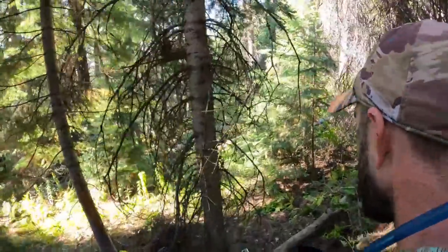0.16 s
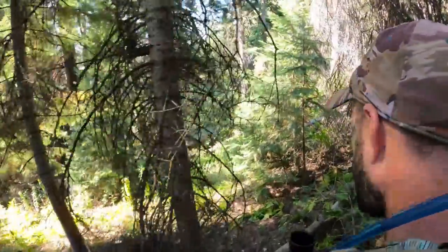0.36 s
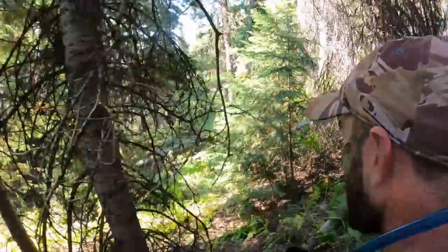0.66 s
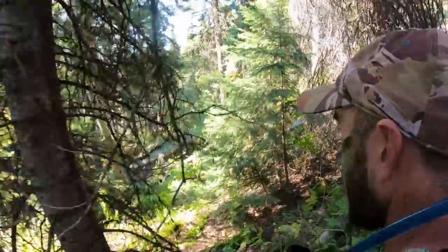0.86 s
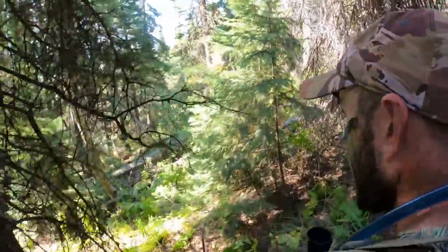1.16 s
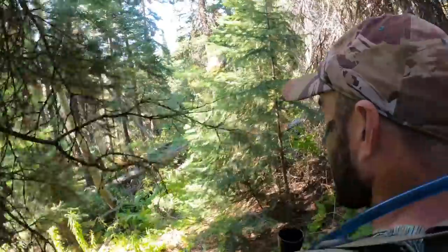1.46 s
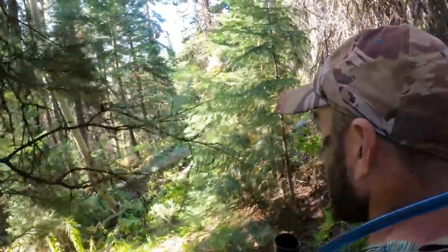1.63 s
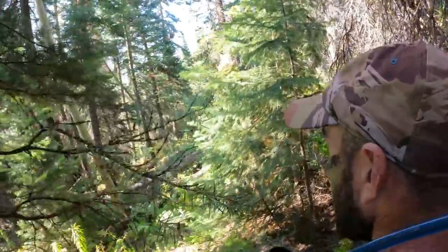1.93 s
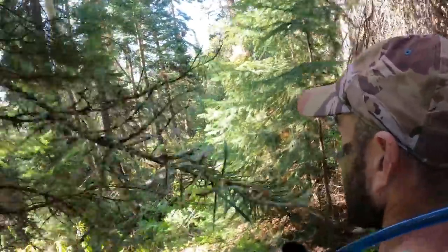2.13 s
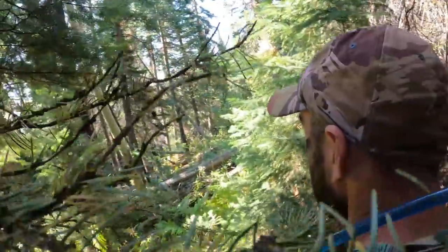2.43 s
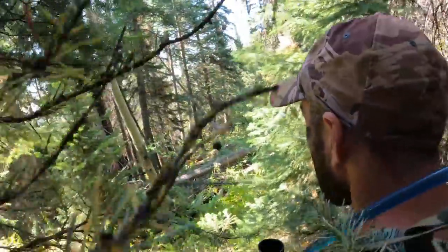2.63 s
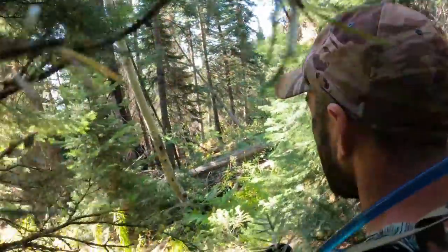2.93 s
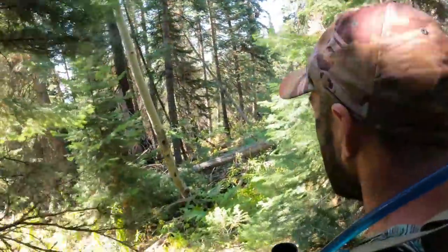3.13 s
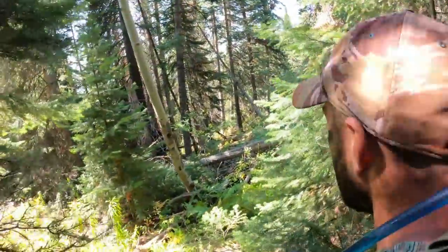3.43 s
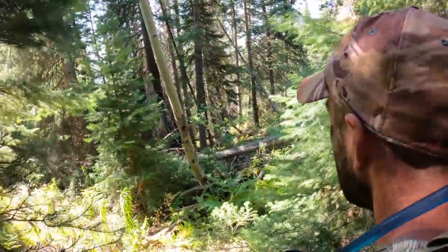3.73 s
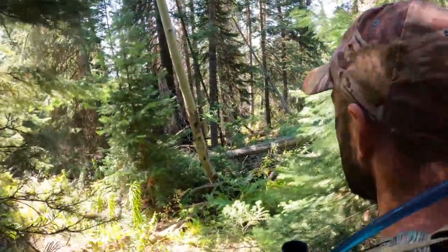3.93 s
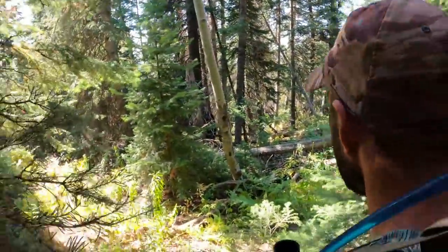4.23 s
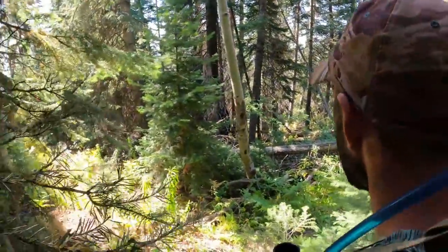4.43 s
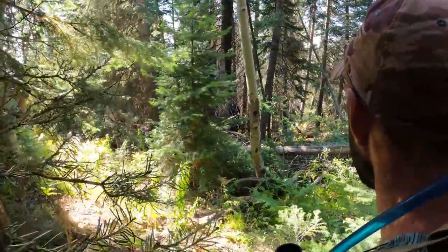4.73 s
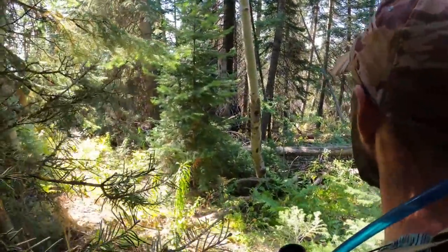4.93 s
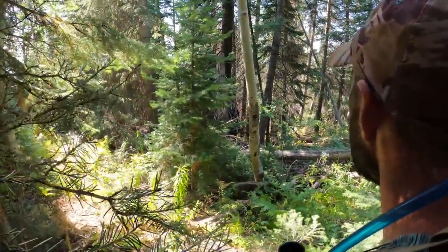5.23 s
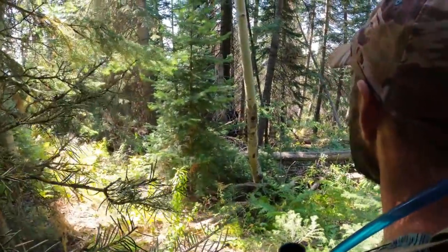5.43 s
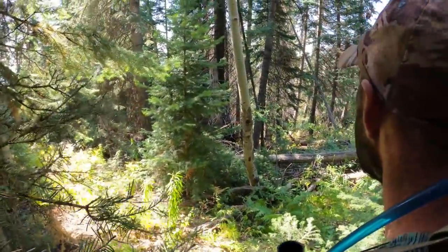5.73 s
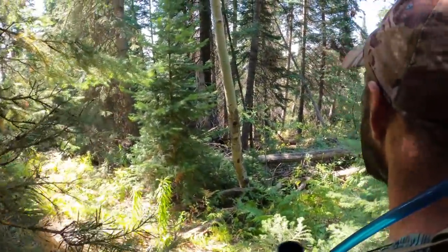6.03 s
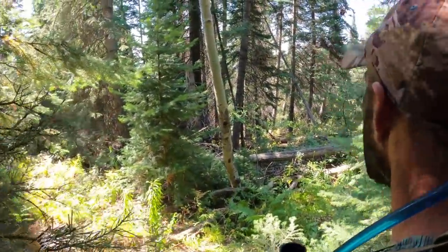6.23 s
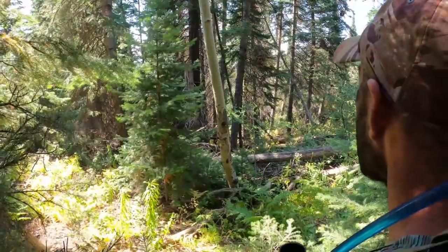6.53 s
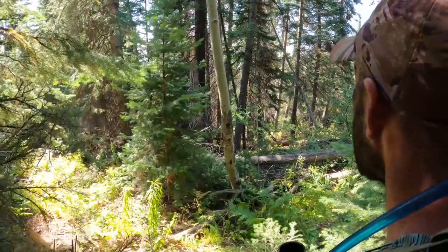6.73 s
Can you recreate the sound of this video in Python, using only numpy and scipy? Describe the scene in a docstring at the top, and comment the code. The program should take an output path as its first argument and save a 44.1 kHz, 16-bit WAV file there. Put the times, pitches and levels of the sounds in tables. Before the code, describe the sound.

Someone pushes through forest undergrowth with rustling fabric, gear bumps and a raspy branch scrape, pauses quietly, then snaps twigs and crunches brush underfoot.

```python
"""Clothes and leaves rustle and dull knocks sound as someone with a shoulder camera walks through dense woodland.
A fir branch drags its needles over the camera, the walker nearly halts, and boots then crunch dry brush.
Friction is shaped noise strewn with tiny fractures; knocks, twigs and needles are driven, damped resonances.
Bumps and heels are low swings that fade; the trunks scatter the twigs and brush back as a decaying noise tail.
"""
import sys
import numpy as np
from scipy import signal
from scipy.fft import rfft, irfft, next_fast_len
from scipy.io import wavfile
from scipy.ndimage import map_coordinates

SR = 44100
rng = np.random.default_rng(int(sys.argv[2]) if len(sys.argv) > 2 else 0)


def transcribe(u):
    """Save the signal u as a 16-bit wav file named by the first command-line argument.

    u: samples, shape (n,) or (channels, n), limited to [-1, 1]; the rate is SR.
    q: integer samples, one column per channel.
    """
    v = np.clip(np.atleast_2d(u).T, -1, 1)
    q = np.round(v * 32767).astype(np.int16)
    wavfile.write(sys.argv[1], SR, q)


N = 302967  # samples

# In all tables levels are relative, before common gains and the microphone; pan_db is left minus right.


def amp(db):
    """Decibel law: 20 dB is a factor of ten in amplitude."""
    return 10 ** (np.asarray(db) / 20)


def unit(x):
    """Normalisation of mean power: scale to rms 1."""
    return x / np.sqrt(np.mean(x ** 2) + 1e-20)


def along(points, hz):
    """Interpolation of (frequency, value) points on a logarithmic frequency axis."""
    f, v = np.transpose(points)
    return np.interp(np.log(hz + 1), np.log(f + 1), v)


def gains(rows):
    """Envelope law: straight lines in decibels, one gain per sample for each column, -120 dB outside."""
    s, *columns = np.transpose(rows)
    t = np.arange(N) / SR
    return [amp(np.interp(t, s, c, left=-120, right=-120)) for c in columns]


def wobble(rate):
    """Slow random modulation: a smooth curve through `rate` random knots a second."""
    knots = rng.standard_normal(int(N * rate / SR) + 4)
    return map_coordinates(knots, [np.arange(N) * rate / SR])


def filtered(x, response):
    """Linear filtering: multiply the spectrum by a complex response of frequency."""
    n = x.shape[-1]
    m = next_fast_len(n + 4096)  # padding keeps ringing from wrapping round
    return irfft(rfft(x, m) * response(np.fft.rfftfreq(m, 1 / SR)), m)[..., :n]


def resonance(f, hz, q):
    """Damped oscillator: the causal response of one mode, with gain 1 at its pitch."""
    return 1j * f * hz / q / (hz * hz - f * f + 1j * f * hz / q)


def panned(x, pan_db):
    """Level-difference stereophony: split pan_db between left and right."""
    return x * unit(amp(np.array([[pan_db], [-pan_db]]) / 2))


def out_of_step(x, radians):
    """Structure-borne phase shift: the left port moves later in its cycle than the right."""
    return filtered(x, lambda f: np.exp(.5j * radians * np.array([[-1], [1]])))


def add(out, s, x):
    """Superposition: mix x into out from time s."""
    i = max(round(s * SR), 0)
    out[:, i:i + x.shape[-1]] += x[:, :max(N - i, 0)]


def crackle(n, rate, spread_db, smooth):
    """Granular friction: two rows of tiny unequal fractures on a bed of smooth noise."""
    size = amp(spread_db * np.minimum(rng.exponential(size=n), 3))
    fractures = (rng.random(n) < rate / SR) * size * rng.uniform(-1.0038, 1, (2, n))
    return unit(unit(fractures) + smooth * rng.standard_normal((2, n)))


def ticks(rate, hz, spread_db):
    """Random impulses on damped modes: sparse tiny twigs give way, each at its own pitch; rms 1."""
    count = int(rate * N / SR)
    when, size, pitch, place = rng.random((count, 4)).T
    t = np.arange(SR // 100) / SR
    own_hz = hz * 3 ** (2 * pitch - 1)  # from a third of hz to three times it
    cycles = own_hz[:, None] * t
    rings = amp(spread_db * size ** 2)[:, None] * np.sin(2 * np.pi * cycles) * np.exp(-cycles / 1.3)
    at = (when * N).astype(int)[:, None] + np.arange(len(t))
    sides = []
    for side in (place, 1 - place):
        weighted = rings * (1 + side)[:, None]
        sides.append(np.bincount(at.ravel(), weighted.ravel(), N)[:N])
    return unit(np.array(sides))


def coloured(pair, spectrum, alike):
    """Interchannel coherence: two unrelated rows become stereo of this spectrum and likeness, rms 1."""
    turn = lambda f: np.arccos(np.clip(along(alike, f), -1, 1)) / 2
    mid_side = lambda f: np.array([np.cos(turn(f)), np.sin(turn(f))])
    mid, side = filtered(pair, lambda f: amp(along(spectrum, f)) * mid_side(f))
    return unit(np.array([mid + side, mid - side]))


# spectrum of the air: frequency_hz [Hz], density_db [dB per Hz]
AIR_SPECTRUM = [(20, 4.5), (45, -4), (80, -27), (130, -5.5), (190, 2.5), (400, 2.5), (850, -10),
                (1200, -1.5), (2000, -12.5), (4000, -31), (7500, -27), (10000, -39.5), (15000, -43)]
# left-right likeness of airborne sound: frequency_hz [Hz], likeness [-1 to 1]
AIRBORNE_LIKENESS = [(100, 0.012), (200, 0.9975), (400, 0.8), (1200, 0.7629), (3000, 0.69), (8000, 0.29)]


def forest_air():
    """Broadband ambient noise: faint, nearly steady air in the trees."""
    noise = rng.standard_normal((2, N))
    return amp(-62 + 1.1 * wobble(6)) * coloured(noise, AIR_SPECTRUM, AIRBORNE_LIKENESS)


def trunks(x, t60):
    """Multiple scattering: the trees return a thin, dull, exponentially decaying tail."""
    t = np.arange(SR // 2) / SR
    tail = rng.standard_normal((2, len(t))) * amp(-60 * t / t60) * (1 - np.exp(-t / 0.011))
    tail = filtered(tail, lambda f: resonance(f, 1200, q=0.9358))
    return signal.fftconvolve(x, tail / np.linalg.norm(tail[0]), axes=1)[:, :N]


def squeak(s, db, length):
    """Narrow-band resonance: a faint, short, hollow squeak of two notes."""
    low_high = lambda f: resonance(f, 772.96, q=11.85) ** 2 + .5 * resonance(f, 1238, q=17.72) ** 2
    notes = filtered(rng.standard_normal(N), low_high)
    return amp(db) * unit(notes) * np.exp(-((np.arange(N) / SR - s) / length) ** 2 / 2)


# how briskly the walker moves: time_s [s], effort_db [dB]
EFFORT = [(0, -3), (.3, -7), (.6, 0.5), (1.05, -0.5), (1.5, -3), (1.8, 0.5), (2.07, -3), (2.35, 0.5),
          (2.62, 0), (3.2, -2), (3.38, -1.5), (3.54, -14), (3.98, -17), (4.3, -4), (4.7, -13), (4.88, -17),
          (5.05, -11.5), (5.45, -23), (5.7, -20)]
# strides and smaller shifts of the body: start_s [s], rise_s [s per 20 dB], hold_s [s],
# cloth_db [dB], leaves_db [dB], pack_rub_db [dB]
MOVES = [(0, 0.01994, .04, -50, -51, -44.5), (0.213, 0.0474, 0.0306, -63.5, -67.5, -51),
         (.521, .025, .012, -36, -48, -36), (.575, .08, .05, -41, -45, -40),
         (0.779, 0.044, .045, -45.5, -51.5, -43), (.93, 0.071, .05, -49.5, -54.5, -48),
         (1.149, 0.05068, 0.06178, -38, -43.5, -37.5), (1.359, .03, .025, -43.5, -60, -48),
         (1.45, 0.0679, .08, -54, -65, -46), (1.625, .11, .07, -42, -46.5, -46.5),
         (1.77, 0.1005, .09, -50.5, -59, -43), (1.938, 0.0861, 0.05927, -52.5, -56, -42),
         (2.12, 0.02855, .02, -54, -53.5, -51), (2.22, 0.045, 0.06094, -49, -61, -41),
         (2.295, 0.03905, .04, -44.5, -49.5, -42), (2.355, .05, .035, -38, -48, -39),
         (2.48, .06, .05, -45, -51, -41), (2.64, .05, .07, -58, -53, -62),
         (2.724, .03, .02, -41.5, -51, -42), (2.871, 0.0617, 0.02873, -48.5, -59, -43.5),
         (3.008, 0.07994, 0.03133, -45, -47, -42.5), (3.122, .08, .045, -36, -39, -32),
         (3.288, 0.05127, 0.04816, -45.5, -52.5, -45.5), (4.255, 0.12764, .035, -46, -50.5, -45.5),
         (4.381, .04, 0.02345, -48.5, -57.5, -52), (4.469, 0.0783, .07, -56.5, -56.5, -61),
         (6.699, 0.06315, 0.0485, -68.5, -71.5, -50.5)]
CLOTH_DB, LEAF_DB, RUB_DB, RUMBLE_DB = -53.5, -56.5, -52, -67  # relative beds at an effort of 0 dB
CLOTH_GROWS, PACK_GROWS = 0.7758, 0.7302  # dB per dB of effort
MOVE_T60_S = 0.2694  # a rustle settles after each move


def movement():
    """Addition of powers: cloth, leaf and pack gains follow the effort and swell with every move."""
    t = np.arange(N) / SR
    effort_db = np.interp(t, *np.transpose(EFFORT))
    cloth_db = CLOTH_DB + CLOTH_GROWS * effort_db
    rub_db = RUB_DB + PACK_GROWS * effort_db
    power = amp([cloth_db, LEAF_DB + effort_db, rub_db]) ** 2
    for s, rise, hold, *levels_db in MOVES:
        swell_db = -20 * np.maximum(s - t, 0) / rise - 60 * np.maximum(t - s - hold, 0) / MOVE_T60_S
        power += np.outer(amp(levels_db), amp(np.maximum(swell_db, -120))) ** 2
    return np.sqrt(power)


# the load lurches on the shoulder: peak_s [s], rumble_db [dB], fade_s [s per 20 dB on either side]
LURCHES = [(.21, -52, 0.0139), (.66, -49, .13), (1.2, -44, 0.1829), (1.88, -50.5, .12), (2.28, -47, .09),
           (2.41, -40.5, 0.0983), (3.16, -52, 0.1166), (4.13, -62, .16), (4.36, -52.5, 0.2072),
           (6.46, -58.5, 0.2358), (6.76, -60.5, 0.13)]


def sway():
    """Addition of powers: the mount's rumble gain follows the effort and swells with every lurch."""
    t = np.arange(N) / SR
    bed = amp(RUMBLE_DB + PACK_GROWS * np.interp(t, *np.transpose(EFFORT)))
    swells = sum(amp(db - 20 * np.abs(t - s) / fade) ** 2 for s, db, fade in LURCHES)
    return np.sqrt(bed ** 2 + swells)


# spectra of the rubbing pack and the shaken mount: frequency_hz [Hz], density_db [dB per Hz]
PACK_SPECTRUM = [(70, -33), (130, -6), (195, 1.5), (260, -4), (400, -21), (800, -59)]
MOUNT_SPECTRUM = [(12, -4.5), (25, 8), (50, -5.5), (80, -13), (120, -26.5), (220, -49.5)]
# left-right likeness of sound through the housing: frequency_hz [Hz], likeness [-1 to 1]
HOUSING_LIKENESS = [(30, -0.028), (200, 0.97645), (4000, .35), (9000, .1)]


def pack(rumble_gain, rub_gain):
    """Stick-slip and structure-borne sound: the swaying pack rubs hollowly and shakes the camera mount."""
    rumble = coloured(rng.standard_normal((2, N)), MOUNT_SPECTRUM, HOUSING_LIKENESS)
    friction = crackle(N, rate=250, spread_db=-0.5, smooth=.8)
    rub = out_of_step(coloured(friction, PACK_SPECTRUM, HOUSING_LIKENESS), radians=1.4)
    rub = unit(rub * amp(1.5 * wobble(22)))  # sticks and slides by turns
    return amp(13.0) * rumble_gain * panned(rumble, pan_db=-3.5) + amp(1.5) * rub_gain * panned(rub, pan_db=-4.5)


# spectra of rubbing clothes and leaves: frequency_hz [Hz], density_db [dB per Hz]
CLOTH_SPECTRUM = [(150, -19), (300, 0), (500, 1), (850, -5), (1150, 0), (1600, -6.5), (2400, -24),
                  (5000, -39.5)]
LEAF_SPECTRUM = [(900, -8.5), (1800, 1.5), (2500, 1.5), (4000, 0), (7000, -3.5), (9000, -11.5),
                 (12500, -18.5), (15500, -33)]


def rustle(cloth_gain, leaf_gain):
    """Intermittent friction: cloth and leaves rub in shared small jerks, with small twigs ticking."""
    jerks = wobble(55)
    cloth = coloured(crackle(N, rate=300, spread_db=2.0, smooth=0.91), CLOTH_SPECTRUM, AIRBORNE_LIKENESS)
    leaves = coloured(crackle(N, rate=1200, spread_db=1.0, smooth=1), LEAF_SPECTRUM, AIRBORNE_LIKENESS)
    cloth = unit(cloth * amp(2 * jerks)) + amp(-7.5) * ticks(rate=42, hz=954.8, spread_db=13.5)
    leaves = unit(leaves * amp(1.7398 * jerks)) + amp(-10.5) * ticks(rate=57, hz=3200, spread_db=12)
    return panned(amp(-.5) * cloth_gain * cloth + amp(4.5) * leaf_gain * leaves, pan_db=-0.1012)


# footfalls and bumps felt through the mount: middle_s [s], level_db [peak dB], pitch_hz [Hz],
# half_length_s [s, standard deviation], pan_db [dB]
BUMPS = [(.21, -43, 75, .012, -3), (.522, -24.5, 326.9, 0.00346, 0), (0.667, -30, 139.1, 0.002598, 0),
         (1.164, -31, 46, .01, -9), (1.195, -29.5, 72.3, 0.02008, -3), (1.243, -24, 112.8, 0.004217, -2),
         (1.64, -33, 450.3, 0.00362, -1), (2.242, -33, 82.45, 0.0136, -10),
         (2.39, -19, 169.3, 0.002518, -2.5), (2.407, -28, 66.16, .026, -5.5),
         (3.125, -16, 237.7, .002, 6.5), (3.14, -25, 70.24, 0.00932, 3), (3.1754, -5, 190, .0014, 1.5),
         (6.18, -42, 165, .015, 0), (6.733, -42, 125.4, 0.006533, 0.5)]


def bumps():
    """Structure-borne impulses: low swings under a bell envelope reach the two ports out of step."""
    out, t = np.zeros((2, N)), np.arange(-SR // 8, SR // 8) / SR
    for s, db, hz, length, pan_db in BUMPS:
        swing = np.cos(2 * np.pi * hz * t + rng.uniform(0, 2 * np.pi))
        add(out, s + t[0], amp(db + 0.5) * panned(swing * np.exp(-(t / length) ** 2 / 2), pan_db))
    return out_of_step(out, radians=1.4)


# dull knocks of gear and sticks, sounded 2 ms after start_s: start_s [s], level_db [peak dB],
# pitch_hz [Hz], pan_db [dB]
KNOCKS = [(.362, -31.5, 400.1, 1), (.521, -20, 379.8, -1.5), (.576, -20.5, 773, -1), (.619, -19, 1129, -2),
          (.811, -23.5, 1038, -1), (1.148, -19, 1391, 1), (1.188, -21, 690.6, -6),
          (1.356, -27, 321.4, -0.5), (1.635, -24, 477, 0.5), (1.989, -31, 490.4, -3.5),
          (2.384, -12, 470, 6), (2.522, -22.5, 611.7, -4), (2.608, -29, 1370, 3), (3.15, -21, 401.9, -18),
          (3.249, -31, 438.7, -0.5), (3.589, -38.5, 301.4, 1), (4.261, -31, 998.5, 1.5),
          (4.296, -29, 1069, 0), (4.378, -32, 1134, -2.5), (4.935, -31.5, 776, -6)]
KNOCK_T60_S = .035  # rattle after each knock


def knocks():
    """Impact excitation: a tap and a short rattle drive one well damped resonance."""
    out, t = np.zeros((2, N)), np.arange(SR // 8) / SR
    for s, db, hz, pan_db in KNOCKS:
        noise = rng.standard_normal((3, len(t)))
        rattle = noise[0] + 0.78 * noise[1:]  # a shared part and one for each side
        force = (t == 0) + 0.07952 * rattle * amp(-60 * t / KNOCK_T60_S)
        knock = filtered(force, lambda f: resonance(f, hz, q=1.477) / (1 + 1j * f / (4 * hz)))
        add(out, s + .002, amp(db) * panned(knock / np.abs(knock).max(), pan_db))
    return out


# a heel landing on hollow forest floor: start_s [s], level_db [peak dB], pitch_hz [Hz], rise_s [s], t60_s [s]
HEELS = [(6.145, -22.5, 55.26, 0.031, 0.1597), (6.198, -30, 90.23, 0.00529, 0.1407)]


def heels():
    """Mass on a spring: the ground takes the weight, swings and settles."""
    out, t = np.zeros((2, N)), np.arange(SR // 3) / SR
    for s, db, hz, rise, t60 in HEELS:
        swell = np.minimum(t / rise, amp(-60 * (t - rise) / t60))
        add(out, s, amp(db) * (swell * np.sin(2 * np.pi * hz * t))[None])
    return out


# bent hardest, the branch lets go needle after needle
DRAG_S, DRAG_EVERY_S, DRAG_SCATTER_S = 3.094, .0107, .002  # start, interval, unevenness
DRAG_DB, DRAG_HALF_S, DRAG_PAN_DB = -19.5, .0026, -12  # mean relative level, half length, left minus right
DRAG_HZ, DRAG_SPREAD_OCTAVES = 4460, .04  # middle pitch and its spread


def drag(count):
    """Repeated stick-slip: rows like those of SLIPS for a quick, uneven run of needles."""
    rows = []
    for k, (late, strong, high) in enumerate(rng.standard_normal((count, 3))):
        middle = DRAG_S + k * DRAG_EVERY_S + DRAG_SCATTER_S * late
        hz = DRAG_HZ * 2 ** (DRAG_SPREAD_OCTAVES * high)
        rows.append((middle, DRAG_DB + 1.5 * strong, DRAG_HALF_S, hz, DRAG_PAN_DB))
    return rows


# the fir branch sliding over the camera: time_s [s], level_db [dB]
BRANCH = [(2.62, -66), (2.92, -57), (2.99, -42), (3.05, -39), (3.09, -34.5), (3.18, -38), (3.22, -70.5)]
# single needles catching and slipping: middle_s [s], level_db [dB], half_length_s [s, standard deviation],
# pitch_hz [Hz], pan_db [dB]
SLIPS = [(1.155, -31, 0.00497, 6470, -3), (2.348, -24, 0.001085, 7045, -10),
         (2.3682, -18, 0.000846, 7592, 1), (2.3833, -12, 0.0010727, 7743, -4),
         (2.423, -30, 0.001957, 7096, -6), (2.438, -32, .0038, 7400, -3), (2.607, -34, .0008, 3500, 2.5),
         (2.737, -25.5, .003, 4500, -15), (2.838, -38.5, .0017, 4300, -4),
         (2.878, -30, 0.0008885, 4180, -2), (2.916, -36.5, 0.000363, 7500, -5),
         (3.009, -18, 0.003017, 4842, -16), (3.034, -17.5, .0027, 4516, -13.5),
         (3.049, -26, .0012, 4500, -2.5), (3.069, -16, 0.000968, 4531, -2),
         (3.129, -21.5, .006, 5908, -6.5), (3.146, -21.5, .0024, 5500, -7), (3.137, -21.5, .002, 3800, -8),
         (3.152, -23, .0019, 1670, -13), (3.184, -20.5, 0.00474, 6532, -5),
         (3.203, -24, 0.0011304, 3116, 0)]
# spectrum of scraping needles: frequency_hz [Hz], density_db [dB per Hz]
NEEDLE_SPECTRUM = [(1000, -30.5), (3300, -11), (4500, 4), (5200, -8), (6800, -10), (8000, -12.5),
                   (9500, -12.5), (11000, -18.5), (15500, -25)]
# response of the camera housing: frequency_hz [Hz], gain_db [dB]
HOUSING_RESPONSE = [(600, -10), (2800, -6.5), (4300, 0.5), (7000, -2.5), (8200, -4), (9600, 0),
                    (11500, -6.5), (15500, -4.5)]


def fir_branch():
    """Stick-slip friction: needles scrape the housing, and those that catch chatter at their own pitch."""
    slide = coloured(crackle(N, rate=1100, spread_db=6.5, smooth=.5), NEEDLE_SPECTRUM, HOUSING_LIKENESS)
    slide = unit(slide * amp(6.3 * wobble(91)))
    out = amp(4.5) * gains(BRANCH)[0] * panned(slide, pan_db=-12.5)
    t = np.arange(-SR // 40, SR // 40) / SR
    for s, db, length, hz, pan_db in SLIPS + drag(count=8):
        grip = np.exp(-(t / length) ** 2 / 2)
        chatter = rng.standard_normal((2, len(t))) * grip
        chatter = chatter + 0.21 * chatter[::-1]  # each port also hears the other's side
        modes = lambda f: resonance(f, hz, q=7.2) + 0.17 * resonance(f, 1.5 * hz, q=9.1)
        body = lambda f: modes(f) * amp(along(HOUSING_RESPONSE, f))
        slip = unit(filtered(chatter, body)) * np.sqrt(np.mean(grip ** 2))
        add(out, s + t[0], amp(db - 1.5) * panned(slip, pan_db))
    return out


# twigs breaking underfoot or against the walker: start_s [s], level_db [peak dB], pitch_hz [Hz], pan_db [dB]
SNAPS = [(.342, -36, 2497, 0), (.364, -36, 2200, 0), (.524, -24, 3500, 0), (.813, -27, 1700, 3),
         (1.992, -29, 2508, 4.5), (2.3466, -15.5, 4000, -7), (2.375, -14, 5000, 2),
         (2.3833, -12, 3200, -12.5), (2.3879, -6.5, 3074, 8), (2.7322, -16.5, 3958, -11.5),
         (4.925, -35.5, 1508, -0.5), (5.781, -33.5, 1366, -2.5), (5.805, -32.5, 1656, -2),
         (5.909, -26, 1595, -1.5), (5.9608, -14, 1869, -1.5), (5.969, -12.5, 1260, -1),
         (6.14, -26, 2200, 0.5), (6.162, -10.5, 2443, -1.5), (6.1986, -6.5, 3717, -1),
         (6.302, -25, 1188, -1.5), (6.449, -24.5, 4546, -4), (6.665, -25.5, 3786, -2.5)]
# splintering time at this pitch; thicker, lower twigs take longer by this power
SPLINTER_T60_S, SPLINTER_HZ, SPLINTER_LAW = .019, 2400, .5


def twigs():
    """Brittle fracture: one sharp crack and brief splintering excite the modes of the wood."""
    out, t = np.zeros((2, N)), np.arange(SR // 12) / SR
    for s, db, hz, pan_db in SNAPS:
        t60 = SPLINTER_T60_S * (SPLINTER_HZ / hz) ** SPLINTER_LAW
        noise = rng.standard_normal((3, len(t)))
        splinters = noise[0] + 0.3276 * noise[1:]
        force = (t == 0) + 0.09918 * amp(-60 * t / max(t60, .003)) * splinters
        modes = lambda f: resonance(f, hz, q=2.8) + 0.1864 * resonance(f, 2 * hz, q=0.8)
        # thick, low twigs also break with less treble
        wood = lambda f: modes(f) / (1 + 1j * f / (2 * hz)) / (1 + 1j * f / 9000)
        crack = filtered(force, wood)
        add(out, s, amp(db - 0.5) * panned(crack / np.abs(crack).max(), pan_db))
    return out


# dry brush stirring around the boots: time_s [s], level_db [dB]
BRUSH = [(5.7, -66), (5.84, -65), (5.9, -48.5), (6.05, -40), (6.12, -46.5), (6.25, -44), (6.5, -52.5),
         (6.87, -50.5)]
# brush giving way under a boot: start_s [s], level_db [dB], rise_s [s], t60_s [s], centre_hz [Hz]
CRUSHES = [(4.738, -44.5, .0015, .26, 2100), (5.57, -57, 0.00315, 0.1497, 3500),
           (5.723, -49.5, 0.00146, 0.3516, 1731), (5.799, -48, 0.006085, 1, 1206),
           (5.907, -36.5, 0.000953, .45, 2256), (5.958, -27, .001, 0.1619, 3552),
           (5.969, -31, 0.001744, 0.2443, 1617), (5.99, -26, 0.01449, 0.2746, 3920),
           (6.162, -30, 0.00093, 0.2202, 2200), (6.2, -37, 0.00354, 0.591, 1713),
           (6.3, -36, 0.001687, .12, 2300), (6.355, -40.5, 0.002665, 0.1605, 2503),
           (6.449, -35, 0.00919, 0.36935, 4349), (6.664, -42, 0.003106, 0.6511, 3850)]
# spectrum of dry brush: frequency_hz [Hz], density_db [dB per Hz]
DRY_SPECTRUM = [(150, -9), (450, 0), (800, -7.5), (1150, 0.5), (2500, -2), (4500, -2), (7000, -6),
                (9000, -11.5), (12500, -15.5), (15500, -33)]
# left-right likeness of the brush in front: frequency_hz [Hz], likeness [-1 to 1]
AHEAD_LIKENESS = [(300, 0.9887), (2500, 0.911), (9000, 0.564)]


def dry_brush():
    """Cascading fracture: each tread sets off a dying shower of tiny breaks over stirring stems."""
    stems = coloured(crackle(N, rate=640, spread_db=-1.0, smooth=1.0), DRY_SPECTRUM, AHEAD_LIKENESS)
    stems = stems + amp(-8.5) * ticks(rate=120, hz=2200, spread_db=12.5)
    out = amp(-3.5) * gains(BRUSH)[0] * stems
    t = np.arange(SR // 2) / SR
    for s, db, rise, t60, hz in CRUSHES:
        fractures = crackle(len(t), rate=900, spread_db=1.5, smooth=0.9704)
        shower = coloured(fractures, DRY_SPECTRUM, AHEAD_LIKENESS)
        shower = unit(filtered(shower, lambda f: resonance(f, hz, q=0.7188)))
        add(out, s, amp(db - 60 * t / t60) * (1 - np.exp(-t / rise)) * shower)
    return panned(out * amp(1.2046 * wobble(70)), pan_db=-0.7915)  # fractures come in clumps


def scene():
    """Superposition of direct and scattered sound: only twigs and brush ring on among the trees."""
    ground = twigs() + dry_brush()
    cloth_gain, leaf_gain, rub_gain = movement()
    walker = rustle(cloth_gain, leaf_gain) + pack(sway(), rub_gain) + knocks() + bumps()
    walker = walker + squeak(6.859, db=-48, length=0.00927)
    return forest_air() + walker + fir_branch() + heels() + ground + amp(-16.0) * trunks(ground, t60=0.25)


# response of the microphone: frequency_hz [Hz], gain_db [dB]
MICROPHONE = [(20, -1.5), (9500, 0.5), (13000, 0), (15000, -4.5), (16000, -16.5)]
TOP_HZ = 15900  # band limit


def record(dry):
    """Interaural-type delay and band limiting: the left port lags slightly and the top octave droops."""
    lag = 2.9e-5 * np.array([[.5], [-.5]])  # s
    heard = filtered(dry, lambda f: amp(along(MICROPHONE, f)) * np.exp(-2j * np.pi * f * lag))
    return filtered(heard, lambda f: f < TOP_HZ)


dry = scene()
out = record(dry)
transcribe(out)
```